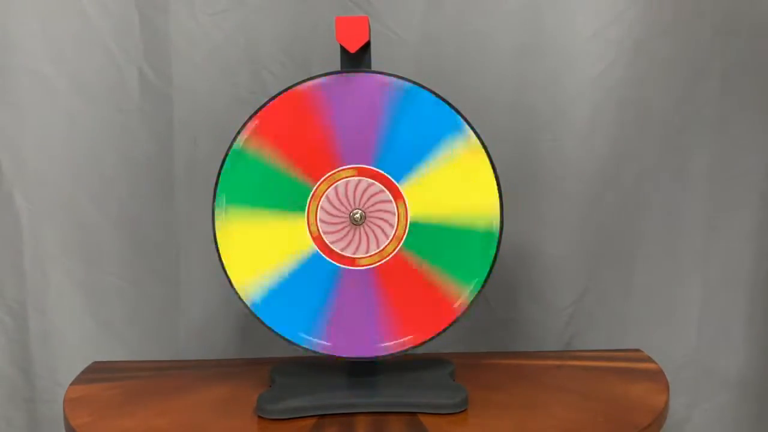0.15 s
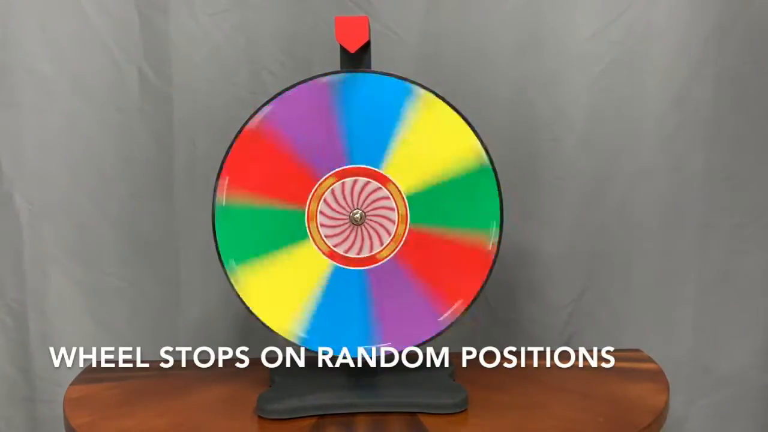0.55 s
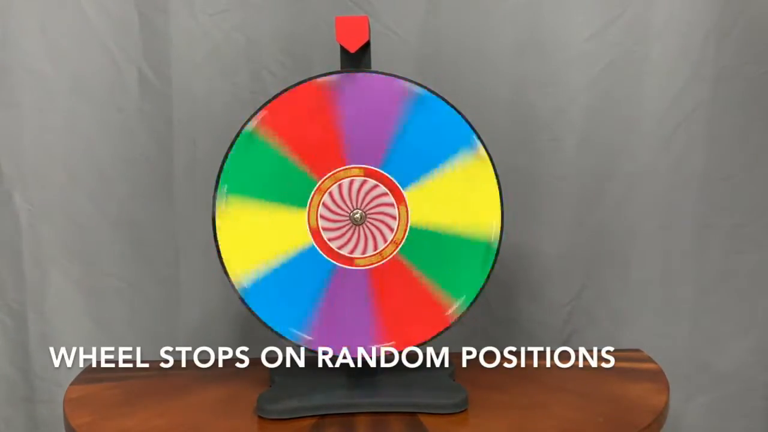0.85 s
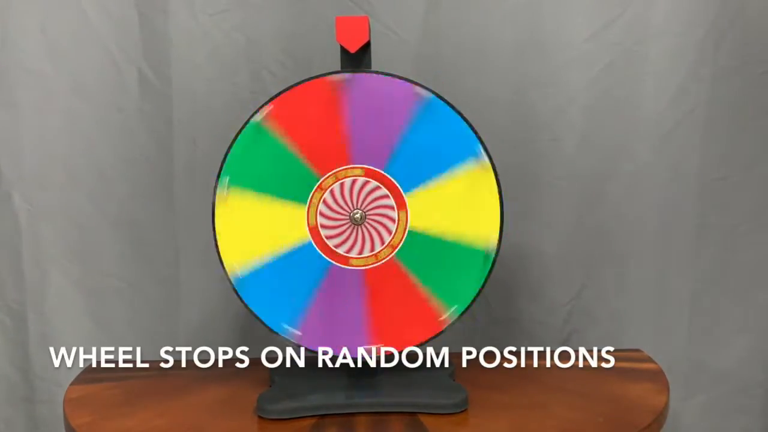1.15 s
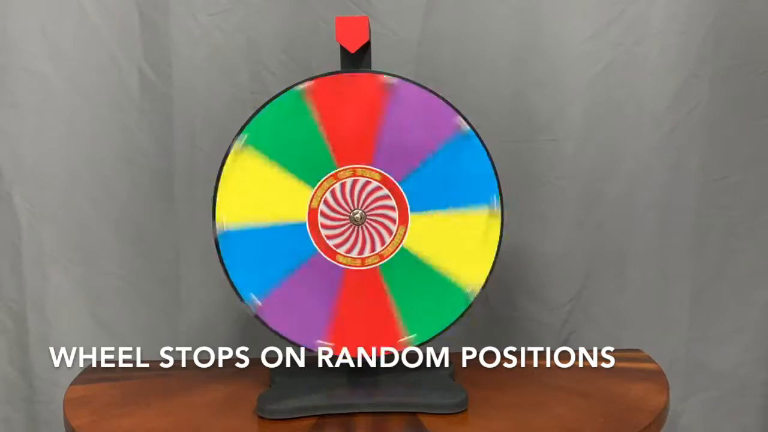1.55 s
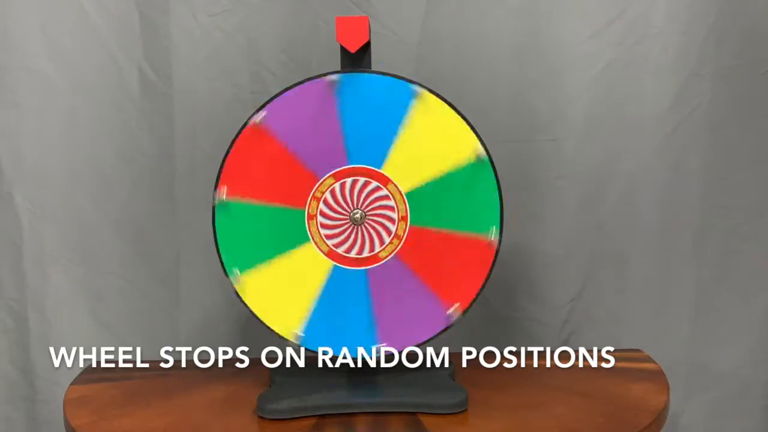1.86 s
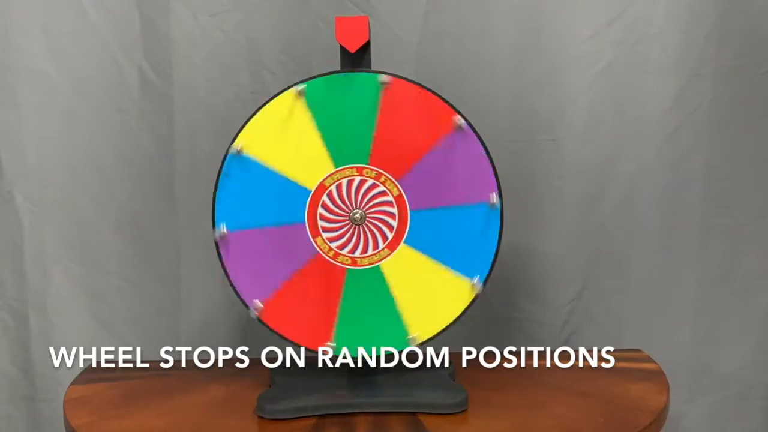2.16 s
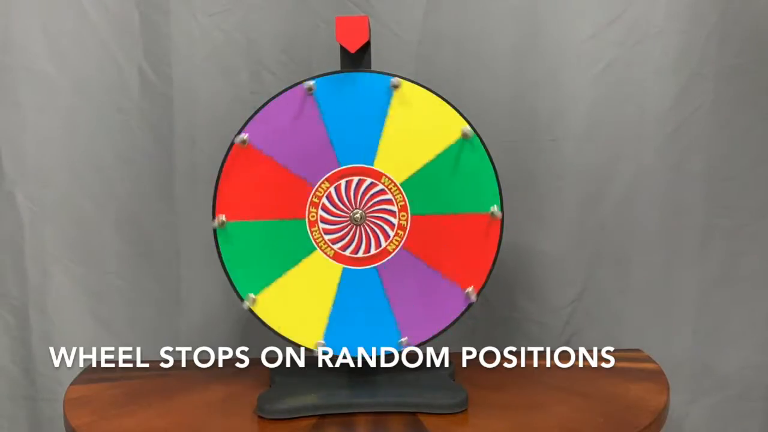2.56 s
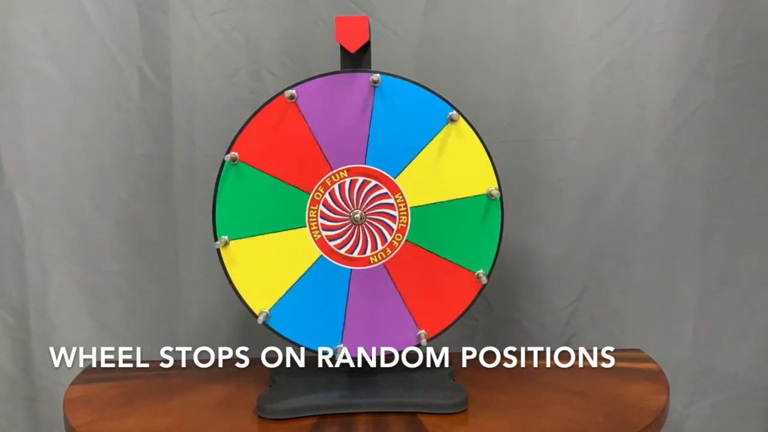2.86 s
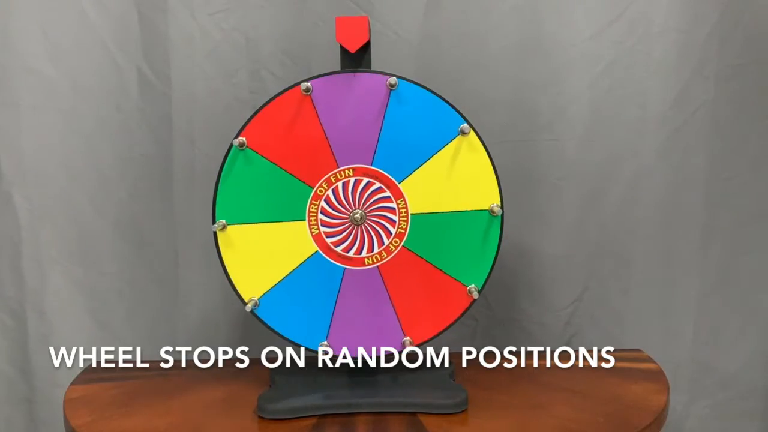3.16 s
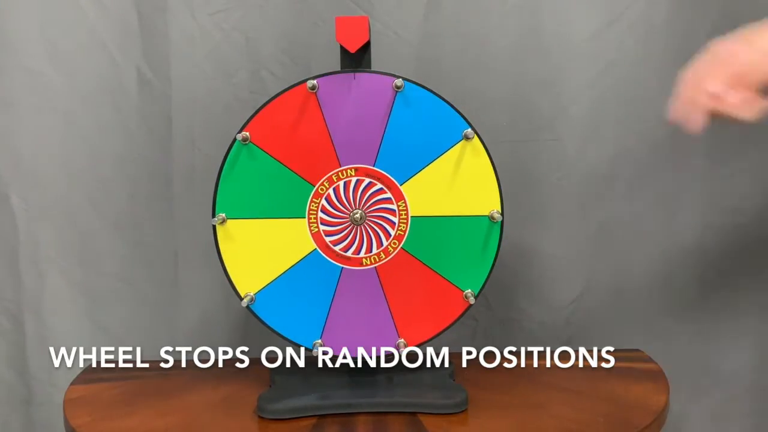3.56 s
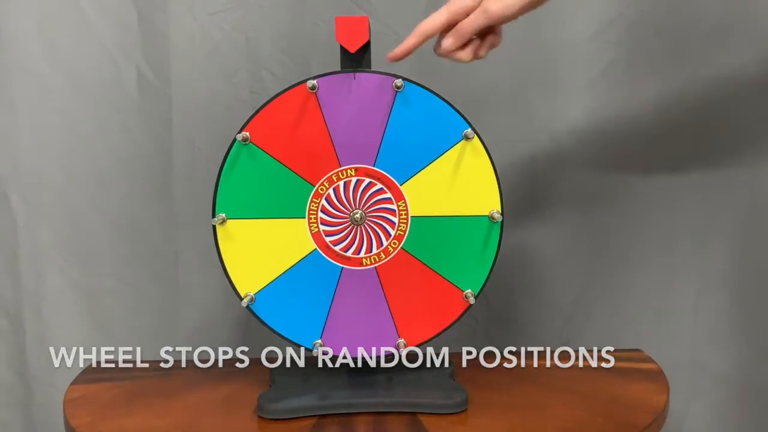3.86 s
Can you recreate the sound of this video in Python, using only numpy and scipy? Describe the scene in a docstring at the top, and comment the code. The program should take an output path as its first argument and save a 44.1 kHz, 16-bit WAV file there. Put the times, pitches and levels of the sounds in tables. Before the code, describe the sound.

A prize wheel's pegs click rapidly against a plastic pointer, slowing gradually to a stop.

```python
"""A tabletop prize wheel spins down in a small room, close to a two-port microphone (stick-slip and modal ringing).
At each metal peg the plastic pointer catches with a bright tick of shaped noise and a grainy rattle;
it then slips and rebounds in a short chatter, clacking the modes of the wheel and stand.
The pointer swings back and knocks the hollow wheel: a dull thud of noise and the low modes.
Pegs and rolling noise grow slower and softer until the wheel stops; a steady room rumble remains."""
import sys
import numpy as np
from scipy import signal
from scipy.fft import rfft, irfft, next_fast_len
from scipy.io import wavfile
from scipy.ndimage import uniform_filter1d

SR = 44100
rng = np.random.default_rng(int(sys.argv[2]) if len(sys.argv) > 2 else 0)


def log_audio(samples):
    """Write samples as a 16-bit WAV file to the path given in sys.argv[1]."""
    # one column per channel
    frames = np.atleast_2d(samples).T
    # limit to full scale, then quantise
    limited = np.clip(frames, -1, 1)
    pcm = np.round(limited * 32767).astype(np.int16)
    wavfile.write(sys.argv[1], SR, pcm)


N = 176400  # length in samples


def amp(db):
    """Level definition: decibels to amplitude gain."""
    return 10 ** (np.asarray(db) / 20)


def read(points, hz):
    """Logarithmic frequency scale: interpolates a table of (f/Hz, value) along it."""
    f, value = np.transpose(points)
    return np.interp(np.log(hz + 1), np.log(f), value)


def add(mix, s, sound):
    """Superposition: adds a sound to the mix at time s in seconds."""
    part = mix[max(0, round(s * SR)):][:len(sound)]
    part += sound[:len(part)]


def colour(x, points):
    """Minimum-phase filtering: a causal response of unit energy shapes the spectrum."""
    hz = abs(np.fft.fftfreq(4096, 1 / SR))
    log_gain = np.log(amp(read(points, hz)))
    # the Hilbert transform of the log gain gives the minimum phase
    response = np.exp(np.conj(signal.hilbert(log_gain)))
    taps = np.fft.ifft(response).real[:2048]
    return signal.oaconvolve(x, taps / np.linalg.norm(taps))[:N]


def decay(t, t60_s):
    """Exponential decay: the amplitude falls by 60 dB in t60_s."""
    return np.exp(-np.log(1000) * t / t60_s)


def rasp(t60_s, rise_s):
    """Rough contact: a noise burst of unit energy that swells in an instant and dies away."""
    t = np.arange(SR // 10) / SR
    swell = (1 - np.exp(-t / rise_s)) ** 2
    burst = rng.standard_normal(len(t)) * swell * decay(t, t60_s)
    return burst / np.linalg.norm(burst)


# metal pegs meeting the pointer, one row each; levels are relative within each kind of sound:
# catch t/s, catch level/dB, slip t/ms and rebound t/ms after the catch, chatter level/dB, knock level/dB
PEG_CONTACTS = [(0.0, -9.5, 3.2, 5.1, -19, -31), (0.0354, -20.5, 3.7, 4.5, -16.5, -53),
                (0.073, -13.5, 3.5, 8, -15, -33), (0.1109, -18.5, 3.7, 4.9, -15, -42),
                (0.1501, -13, 4.0, 4.9, -17, -34.5), (0.1889, -13, 4.5, 6.7, -19, -34),
                (0.227, -14.3, 6.7, 10.3, -15, -33.5), (0.2672, -14.5, 5.2, 9.4, -16.5, -27.5),
                (0.308, -18.5, 5.2, 7.0, -13, -30), (0.35, -14.4, 5.0, 7.7, -15.5, -34),
                (0.3913, -17.5, 5.5, 8.2, -16.5, -40), (0.4347, -20.5, 6.0, 11.5, -13.5, -37.5),
                (0.4789, -17.5, 6.5, 10.6, -16, -29), (0.5233, -15, 6.2, 10.9, -16, -32.5),
                (0.5693, -21.5, 6.5, 12, -15.5, -29), (0.615, -32.5, 6.7, 9.5, -13.5, -33),
                (0.669, -17.5, 3.5, 3.9, -17, -37), (0.7174, -16.5, 4.0, 5.2, -16, -31.5),
                (0.767, -17, 4.2, 4.9, -17, -37), (0.8184, -15, 5.2, 10.4, -18, -28.5),
                (0.8702, -18.5, 5.0, 7.2, -15.5, -47), (0.9234, -19.5, 5.5, 7.8, -17.5, -40),
                (0.9777, -15, 6.7, 9.4, -16.5, -41), (1.0342, -20, 6.5, 9.9, -15.5, -35),
                (1.09, -23.0, 6.7, 12.2, -16.0, -30.5), (1.1585, -17.5, 4.5, 5.8, -19.5, -36),
                (1.2198, -16.5, 5.0, 7.2, -20, -36), (1.2832, -21, 5.7, 8.5, -16.5, -34),
                (1.35, -14.5, 6.2, 9.3, -16.5, -31), (1.418, -27.3, 7.0, 10.6, -17.8, -30),
                (1.4976, -19, 5.2, 8.6, -18.5, -36), (1.5731, -21.5, 6.2, 10.5, -20, -42),
                (1.6526, -23, 7.0, 11.3, -18.5, -37.5), (1.744, -15, 5.5, 7.7, -21, -43.5),
                (1.8307, -18.5, 6.5, 10.8, -18, -36.5), (1.9313, -22.5, 5.2, 11.8, -17.5, -40.5),
                (2.0321, -26.5, 7.2, 16.5, -20, -33), (2.1582, -23, 6.5, 9.2, -21, -32.5),
                (2.302, -23.5, 6.0, 12.1, -21.5, -31.0), (2.4801, -32.5, 7.0, 17.8, -24.5, -31),
                (2.7467, -39.5, 6.5, 12.2, -32, -32)]
CATCH_S, CATCH_DB, SLIP_MS, REBOUND_MS, CHATTER_DB, KNOCK_DB = np.transpose(PEG_CONTACTS)
SLIP_S, REBOUND_S = CATCH_S + SLIP_MS / 1000, CATCH_S + REBOUND_MS / 1000
GAPS_S = np.diff(CATCH_S)  # spacing between pegs

# spectrum of the bright peg ticks: f/Hz, relative level per Hz/dB
TICK_SPECTRUM = [(100, -22.5), (2400, -19.5), (4800, -6), (6700, -14), (7900, -1.5), (9400, 1.5),
                 (10600, 0), (12000, -8.5), (13500, -3), (15500, -9.5), (16200, -31.5)]
TICK_GAIN_DB, TICK_RISE_S = 15, 0.0004
TICK_T60_S, REBOUND_T60_S = 0.011, 0.018


def peg_ticks():
    """Stick-slip: each peg catches the pointer, slips off it and meets its rebound."""
    ticks = np.zeros(N)
    for times, levels, t60_s in ((CATCH_S, CATCH_DB, TICK_T60_S), (SLIP_S, CHATTER_DB, TICK_T60_S),
                                 (REBOUND_S, CHATTER_DB, REBOUND_T60_S)):
        for s, db in zip(times, levels):
            add(ticks, s, amp(TICK_GAIN_DB + db) * rasp(t60_s, TICK_RISE_S))
    return colour(ticks, TICK_SPECTRUM)


BLOW_RISE_S = 0.0019  # time constant of the softer onsets
CHATTER_FOLLOW = 0.64  # dB of rattle or clack per dB of contact level

# spectrum of the plastic pointer's grainy rattle: f/Hz, relative level per Hz/dB
RATTLE_SPECTRUM = [(300, -7), (560, 5), (690, -12.5), (930, 6.5), (1150, -13.5), (1680, 6), (2350, -21),
                   (2850, -2.5), (7500, -13)]
RATTLE_GAIN_DB, RATTLE_T60_S, CATCH_OFFSET_DB = -3, 0.022, -9


def pointer_rattle():
    """Rough contact noise: the plastic rattles at catch, slip and rebound, growing less than the ticks."""
    rattles = np.zeros(N)
    for times, levels in ((CATCH_S, CATCH_DB + CATCH_OFFSET_DB), (SLIP_S, CHATTER_DB),
                          (REBOUND_S, CHATTER_DB)):
        for s, db in zip(times, levels):
            gain = amp(RATTLE_GAIN_DB + CHATTER_FOLLOW * db)
            add(rattles, s, gain * rasp(RATTLE_T60_S, BLOW_RISE_S))
    return colour(rattles, RATTLE_SPECTRUM)


# dull spectrum shared by the rolling wheel and the knock's thud: f/Hz, relative level per Hz/dB
DULL_SPECTRUM = [(30, -35), (120, -2), (380, 3.5), (1150, -20.5), (2300, -19), (5000, -38.5)]
ROLL_DB = -55  # at full speed


def roll():
    """Rolling noise: the turning wheel rumbles through its stand, its power following the speed."""
    ends = np.r_[CATCH_S[1:], CATCH_S[-1] + GAPS_S[-1]]
    relative_speed = np.r_[GAPS_S[0] / GAPS_S, 0]
    speed = np.interp(np.arange(N) / SR, ends, relative_speed)
    return colour(amp(ROLL_DB) * np.sqrt(speed) * rng.standard_normal(N), DULL_SPECTRUM)


# modes in which wheel, pointer and stand ring together: f/Hz, relative level/dB, T60 t/s
BODY_MODES = [(183.8, -13.5, 0.25), (237.3, -12, 0.26), (283.8, -13.5, 0.18), (458.2, -4, 0.075),
              (583.4, -8, 0.071), (708.8, -24.5, 0.46), (832.3, -11, 0.15), (2167, -20, 0.12),
              (2699, -13.5, 0.078), (4051, -8, 0.11)]
SPREAD_DB, DETUNE = 3, 0.012  # blow to blow: largest change of strength; standard deviation of pitch (share)


def ring(above_hz=0, below_hz=np.inf, order=8):
    """Modal superposition: one blow excites the damped modes in a band, varied in strength and pitch."""
    t = np.arange(SR // 2) / SR
    hz, db, t60_s = np.transpose(BODY_MODES)[:, :, None]
    size, pitch, turn = rng.standard_normal((3, len(hz), 1))
    reach = 1 / np.sqrt((1 + (above_hz / hz) ** order) * (1 + (hz / below_hz) ** order))
    strength = reach * amp(db + SPREAD_DB * size.clip(-1, 1))
    waves = np.sin(2 * np.pi * (hz * (1 + DETUNE * pitch) * t + turn))
    return (strength * decay(t, t60_s) * waves).sum(0) * (1 - np.exp(-t / BLOW_RISE_S))


def pointer_clack():
    """Impact excitation: the slipping pointer clacks lightly and misses the low modes."""
    clacks = np.zeros(N)
    for s, db in zip(SLIP_S, CHATTER_DB):
        add(clacks, s, amp(-18 + CHATTER_FOLLOW * db) * ring(above_hz=380))
    return clacks


# the knock comes this share of the peg spacing after the catch; the share grows per s squared
SWING_SHARE, SWING_GROWTH = .28, 1.93
THUD_GAIN_DB, THUD_T60_S = 17, 0.072
BODY_GAIN_DB, BODY_BELOW_HZ = 2.5, 1730


def knock():
    """Soft impact: the pointer swings back with a dull thud and misses the high modes."""
    thuds, body = np.zeros(N), np.zeros(N)
    spacing = np.r_[GAPS_S[0], GAPS_S]
    times = CATCH_S + spacing * (SWING_SHARE + SWING_GROWTH * spacing ** 2)
    for s, db in zip(times, KNOCK_DB):
        add(thuds, s, amp(THUD_GAIN_DB + db) * rasp(THUD_T60_S, BLOW_RISE_S))
        add(body, s, amp(BODY_GAIN_DB + db) * ring(below_hz=BODY_BELOW_HZ))
    return colour(thuds, DULL_SPECTRUM) + body


# likeness of the diffuse sound at the two ports: f/Hz, coherence (share)
PORT_COHERENCE = [(200, 0.95), (900, 0.48), (4500, 0.1), (7000, 1)]


def pair(z, hz):
    """Spatial coherence: makes two unrelated spectra as alike as the two ports hear them."""
    same = np.clip(read(PORT_COHERENCE, hz), 0, 1)
    return np.array([z[0], same * z[0] + np.sqrt(1 - same ** 2) * z[1]])


# reverberation time of the room: f/Hz, T60 t/s
REVERB_TIME = [(160, 1.1), (450, 0.24), (4000, 0.29), (16000, 0.27)]
# reverberant level against the direct sound: f/Hz, level/dB
REVERB_LEVEL = [(700, -6.5), (2000, 2.5), (5000, -1.5), (10000, -8)]
EARLY_DB, EARLY_T60_S = -4.5, 0.051


def room(x):
    """Reverberation: quick reflections from table and wheel face, then a tail decaying by frequency."""
    hz, t, z = signal.stft(rng.standard_normal((2, SR * 3 // 4)), SR, nperseg=256)
    hz = hz[:, None]
    # decay rates of power, so that rate * exp(-rate * t) has unit energy
    late_rate = 2 * np.log(1000) / read(REVERB_TIME, hz)
    early_rate = 2 * np.log(1000) / EARLY_T60_S
    late = amp(read(REVERB_LEVEL, hz)) ** 2 * late_rate * np.exp(-late_rate * t)
    early = amp(EARLY_DB) ** 2 * early_rate * np.exp(-early_rate * t)
    tail = signal.istft(pair(z, hz) * np.sqrt((late + early) / SR), SR, nperseg=256)[1]
    tail *= np.minimum(np.arange(tail.shape[1]) / SR / 0.0011, 1)  # 1.1 ms fade-in
    return signal.fftconvolve(x[None], tail, axes=1)[:, :N]


def turning_room(x, count=5):
    """Time-varying reflection: the wheel has turned by each peg, so count responses take turns."""
    peg = np.searchsorted(CATCH_S, np.arange(N) / SR)
    wet = np.zeros((2, N))
    for k in range(count):
        gate = uniform_filter1d(1. * (peg % count == k), size=64)  # short crossfades
        wet += room(x * gate)
    return wet


# spectrum of the steady room rumble: f/Hz, relative level per Hz/dB
RUMBLE_SPECTRUM = [(30, -30.5), (58, 2), (160, -8), (280, -16), (560, -39.5), (16000, -56)]
RUMBLE_DB = -55.5  # RMS


def rumble():
    """Stationary random noise: a steady low room rumble with a trace of hiss."""
    hz = np.fft.rfftfreq(N, 1 / SR)
    spectra = pair(rfft(rng.standard_normal((2, N))), hz)
    noise = irfft(spectra * amp(read(RUMBLE_SPECTRUM, hz)), N)
    return amp(RUMBLE_DB) * noise / noise.std()


def scene():
    """Superposition: the wheel's direct sound, its reverberation and the room rumble."""
    direct = peg_ticks() + pointer_rattle() + roll() + pointer_clack() + knock()
    return direct + turning_room(direct) + rumble()


# phase by which the left port leads the right: f/Hz, phase/rad
PORT_LEAD = [(1700, 0), (3400, 2.1), (5600, 2.3), (6500, -.2), (8700, -3.14), (11100, -6.28),
             (13400, -9.42), (15600, -12.6)]
EDGE_HZ = 16300


def record(dry):
    """Interaural-style phase difference: the ports hear the treble out of step; then a low-pass."""
    size = next_fast_len(N + 4096)
    lead = read(PORT_LEAD, np.fft.rfftfreq(size, 1 / SR))
    turns = np.exp(.5j * np.array([lead, -lead]))  # half the lead to each port
    ports = irfft(rfft(dry, size) * turns, size)[:, :N]
    low_pass = signal.firwin(255, EDGE_HZ, window=("kaiser", 8), fs=SR)
    return signal.oaconvolve(ports, low_pass[None], "same")


dry = scene()
out = record(dry)
log_audio(out)
```